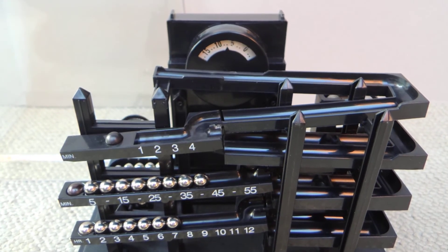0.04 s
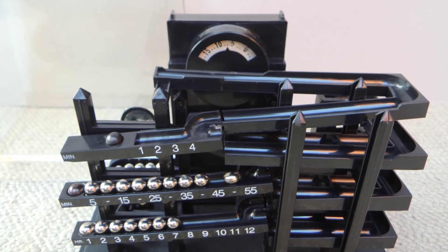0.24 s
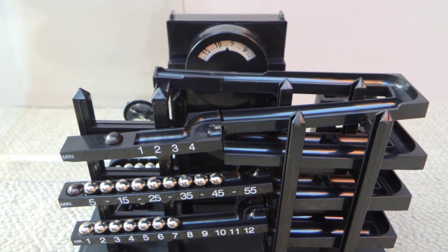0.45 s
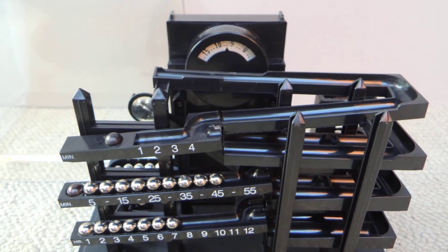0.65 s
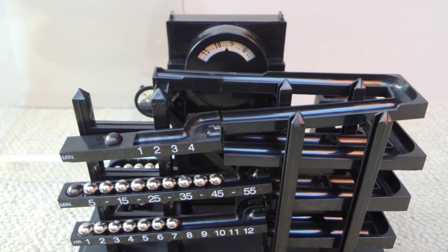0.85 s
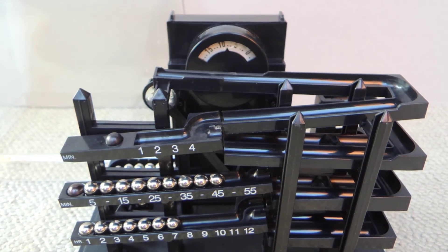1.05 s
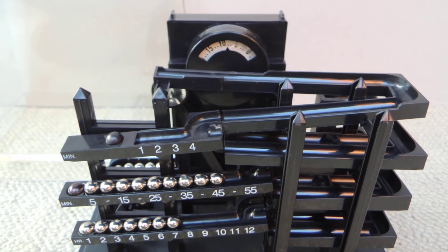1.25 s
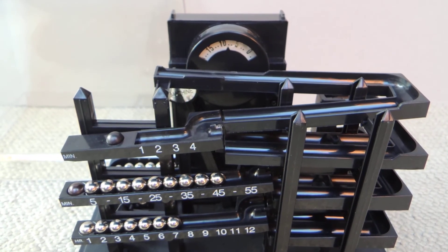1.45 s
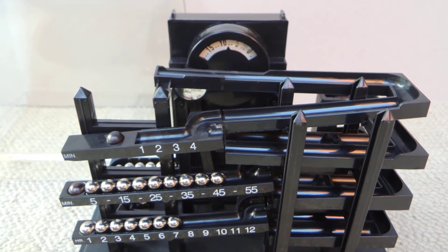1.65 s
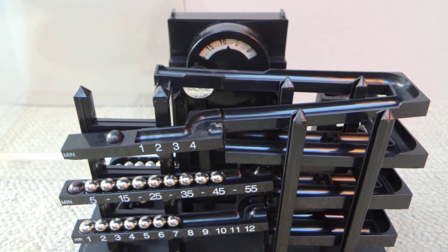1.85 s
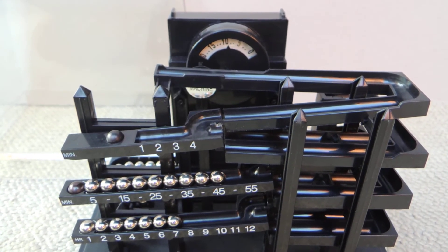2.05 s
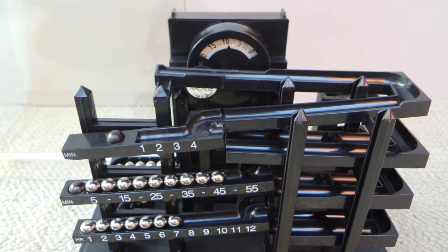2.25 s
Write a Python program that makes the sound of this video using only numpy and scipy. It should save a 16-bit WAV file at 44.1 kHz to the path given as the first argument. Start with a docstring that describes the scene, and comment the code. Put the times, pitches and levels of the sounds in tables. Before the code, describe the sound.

Close up in a quiet room, steel balls roll and clatter along a ball clock's plastic tracks over a faint motor hum. Five land in turn against a row of balls with bright clicks, and the rolling dies away.

```python
"""Steel balls run down the plastic rails of a rolling ball clock, heard close up in a quiet room.
From the start they rumble over tiny bumps while the drive hums underneath. They bounce lightly, knock
against the turns, click together and tick on the rail wall; the room gives each hit a short bright tail.
From 1.2 seconds on, five balls bump one by one into the waiting row and make the end stop ring.
Near 1.9 seconds the rolling dies away, leaving the hum, a low drone and one soft scuff."""
import sys
import numpy as np
from scipy import signal
from scipy.fft import rfft, irfft
from scipy.io import wavfile
from scipy.ndimage import uniform_filter1d

SR = 44100
rng = np.random.default_rng(int(sys.argv[2]) if len(sys.argv) > 2 else 0)


def generate_wav(signal):
    """Clip the signal to [-1, 1] and save it as 16-bit WAV at the path in sys.argv[1]."""
    frames = np.transpose(np.atleast_2d(signal))
    scaled = np.clip(frames, -1, 1) * 32767
    pcm = np.round(scaled).astype(np.int16)
    wavfile.write(sys.argv[1], SR, pcm)


N = 101429
HIT_TIME = np.arange(SR // 10) / SR  # seconds since a hit

# The thud, clack and treble of a hit. Each row: low edge in Hz, high edge in Hz, rise in seconds,
# fade in seconds, stereo width in dB, room echo in dB.
BANDS = [(530, 1880, 0.00086, 0.068, -24.5, -20.5), (2360, 5240, 0.00029, 0.03, -15, -19),
         (6070, 13370, 0.00019, 0.02, -6.5, -13.5)]
# The tone of the low rumble and of the bright grit. Each row: frequency in Hz, level in dB.
RUMBLE_TONE = [(200, -30.5), (330, -19), (480, -3), (680, -3.5), (1000, 0.5), (1350, -5), (2000, -7.5),
               (4000, -33.5)]
GRIT_TONE = [(1000, -19), (2000, -21), (2600, -1), (4300, -1), (4900, -9), (14000, -29)]


def undb(db):
    """Turn decibels into a number to multiply by."""
    return 10 ** (np.asarray(db) / 20)


def unit(x):
    """Scale a sound to an average strength (rms) of 1."""
    return x / np.sqrt(np.mean(x ** 2))


def burst(x):
    """Scale a hit so that its first 4.7 milliseconds have a strength of 1."""
    return x / np.sqrt(np.mean(x[..., :int(0.0047 * SR)] ** 2, axis=-1, keepdims=True))


def curve(rows, column=1):
    """Join (seconds, dB) points into a volume that changes over time."""
    rows = np.array(rows)
    return undb(np.interp(np.arange(N) / SR, rows[:, 0], rows[:, column]))


def colour(x, points):
    """Turn frequencies up or down along (Hz, dB) points."""
    hz, db = np.array(points).T
    freqs = np.maximum(np.fft.rfftfreq(x.shape[-1], 1 / SR), 1)
    return irfft(rfft(x) * undb(np.interp(np.log(freqs), np.log(hz), db)), x.shape[-1])


def band(x, low, high):
    """Keep the frequencies between low and high."""
    return signal.sosfilt(signal.butter(2, [low, high], "band", fs=SR, output="sos"), x)


def spread(pair, width_db):
    """Make stereo: one signal sits in the middle, the other adds width."""
    return pair[0] + undb(width_db) * pair[1] * np.array([[1], [-1]])


def fade(t, fade_s):
    """Die away by 60 dB in fade_s seconds."""
    return np.exp(-np.log(1000) * t / fade_s)


def add(track, start, sound):
    """Mix a sound in at a start time in seconds."""
    i = int(start * SR)
    track[:, i:i + sound.shape[-1]] += sound[..., :N - i]


def cluster(hz, width_hz, fade_s, scatter):
    """Twelve close tones fade together; with little scatter they start in step. High ones sound wider."""
    pitches = hz + width_hz * (rng.random((12, 2, 1)) - 1 / 2)
    cycles = pitches * HIT_TIME + scatter * rng.random((12, 2, 1))
    pair = burst(np.sin(2 * np.pi * cycles).sum(axis=0) * fade(HIT_TIME, fade_s))
    low, high, _, _, width_db, _ = np.array(BANDS).T
    return spread(pair, np.interp(hz, (low + high) / 2, width_db))


def resonate(tones):
    """A plastic part rings in a few narrow groups of tones."""
    return burst(sum(undb(db) * cluster(hz, 0.061 * hz, fade_s, scatter=0.53) for hz, db, fade_s in tones))


def frame_ring():
    """The plastic frame rings, struck at a random spot."""
    # The frame's own tones. Each row: pitch in Hz, level in dB, fade in seconds.
    tones = [(684.7, -9.5, 0.14), (901, 3.5, 0.063), (1005.3, 3.5, 0.062), (1612, 8.5, 0.048),
             (2598, -4.5, 0.088), (3396, -4.5, 0.072), (4264, 5, 0.016), (7270, 3, 0.032),
             (10660, 12, 0.0069)]
    phases = rng.uniform(0, 2 * np.pi, (len(tones), 2, 1))
    return sum(undb(db) * fade(HIT_TIME, fade_s) * np.sin(2 * np.pi * hz * HIT_TIME + phase)
               for (hz, db, fade_s), phase in zip(tones, phases))


def roll(tone, bumps_per_s, width_db, ring_db, smear_s):
    """Tiny uneven bumps under the rolling balls shake the frame."""
    sizes = undb(4 * np.clip(rng.standard_normal(N), -2, 2))
    bumps = (rng.random(N) < bumps_per_s / SR) * sizes
    smeared = signal.lfilter([1], [1, -np.exp(-1 / (smear_s * SR))], bumps)
    shaking = smeared * rng.standard_normal((2, N))
    ringing = signal.fftconvolve(shaking, frame_ring(), axes=1)[:, :N]
    both = unit(shaking) + undb(ring_db) * unit(ringing)
    return spread(unit(colour(both, tone)), width_db)


def rolling():
    """The running balls make a hollow rumble and a fine gritty rattle."""
    # How loud the rolling is. Each row: time in seconds, rumble in dB, grit in dB.
    levels = [(0, -39.5, -43), (.13, -40, -41), (.29, -40.5, -39.5), (.51, -44.5, -45), (.68, -43.5, -43.5),
              (.82, -47.5, -50), (.9, -40, -41.5), (1.13, -41, -40), (1.48, -45, -43.5),
              (1.73, -46.5, -43.5), (1.85, -43, -48.5), (1.9, -61, -69), (2.3, -59, -93)]
    rumble = roll(RUMBLE_TONE, bumps_per_s=2000, width_db=-22, ring_db=-15, smear_s=0.0024)
    grit = roll(GRIT_TONE, bumps_per_s=2200, width_db=-16.5, ring_db=-12, smear_s=0.00033)
    return rumble * curve(levels, column=1) + grit * curve(levels, column=2)


def wander(turns_per_s):
    """A value that drifts smoothly at random, with a strength of 1."""
    step = int(SR / turns_per_s)
    stairs = np.repeat(rng.standard_normal(N // step + 1), step)
    return unit(uniform_filter1d(stairs, step)[:N])


def wavering_tone(hz, waver_db):
    """A pure tone whose volume and pitch drift a little."""
    volume = np.sqrt(2) * undb(waver_db * wander(12))
    pitch = hz * (1 + 0.0166 * wander(17))
    return volume * np.sin(2 * np.pi * np.cumsum(pitch) / SR)


def drive():
    """The drive hums, along with a low wavering drone and its faint overtone."""
    # How loud the hum and the drone are. Each row: time in seconds, level in dB.
    hum_levels = [(0, -48.5), (.35, -50), (1.48, -55), (1.9, -65.5), (2.3, -58)]
    drone_levels = [(0, -74.5), (1.8, -61), (2.15, -63.5), (2.23, -49), (2.3, -65)]
    hum = curve(hum_levels) * wavering_tone(hz=64.2, waver_db=0.7)
    drone = curve(drone_levels) * wavering_tone(hz=91, waver_db=2.5)
    overtone = undb(-64.5) * wavering_tone(hz=186, waver_db=2.5)
    return hum + drone + overtone


def air():
    """Still room air makes a faint, deep rush."""
    # Each row: frequency in Hz, level in dB.
    tone = [(25, 2), (54, -10), (96, -6.5), (187, -9), (353, -14.5), (14000, -35)]
    return undb(-54) * spread(unit(colour(rng.standard_normal((2, N)), tone)), width_db=-6)


def strike(thud_db, clack_db, treble_db):
    """Steel hits plastic: a noisy crack, quickest in the treble, and the frame's ring."""
    out, ring = 0, undb(-19) * frame_ring()
    for (low, high, rise_s, fade_s, width_db, _), db in zip(BANDS, (thud_db, clack_db, treble_db)):
        noise = rng.standard_normal((2, len(HIT_TIME))) * fade(HIT_TIME, fade_s)
        crack = (noise + ring) * (1 - np.exp(-HIT_TIME / rise_s))
        out = out + undb(db) * spread(burst(band(crack, low, high)), width_db)
    return out


def taps():
    """Balls bounce lightly on the rails, each time with a small crack."""
    # Each row: start in seconds, level in dB, treble in dB compared with that level.
    bounces = [(.0305, -32.5, -8), (.1036, -30.5, -7), (.1788, -21.5, -16), (.2183, -28.5, -2),
               (.2384, -23.5, 0.5), (.3433, -32, 4), (.4262, -31, -3), (.4327, -24.5, -6),
               (.4834, -27, -12), (.596, -29.5, 0), (.6347, -25, -3), (.6557, -25, -8), (.682, -32.5, -5),
               (.7116, -30.5, -7), (.7276, -29, -9.5), (.775, -29.5, -10), (0.8624, -33, -15),
               (0.923, -37.5, 1), (.9598, -50, 17), (.9876, -27, -6), (1.0381, -30.5, -8.5),
               (1.0468, -29, -22), (1.2303, -26, -7), (1.2389, -24.5, -4), (1.2536, -26.5, -10),
               (1.3729, -34, -11), (1.487, -33.5, -16), (1.534, -30.5, -3.5), (1.658, -35, -15),
               (1.7517, -25, -6), (1.8392, -31, 2), (1.8815, -28.5, -4)]
    out = np.zeros((2, N))
    for start, db, treble_db in bounces:
        add(out, start, undb(db) * strike(thud_db=-9.5, clack_db=0, treble_db=treble_db))
    return out


def knocks():
    """Hard knocks ring both the part they hit and the clock's hollow plastic body."""
    # Each row: start in seconds, level in dB, thud in dB, treble in dB, ring pitch in Hz, ring in dB,
    # second ring in dB. Thud, treble and rings are compared with the row's level.
    hits = [(.0729, -25.5, -14, 3, 4450, 3.5, -10.5), (.1226, -32.5, -6, 10, 11740, 13, -19),
            (.1436, -23, -14, 1.5, 4000, 1, -5.5), (0.166, -26.5, 4.5, -1.5, 2600, -12, -4.5),
            (0.1713, -11, -9.5, 6, 2470, 2.5, -10), (0.2338, -22, -9, 6.5, 4400, -3, -9.5),
            (0.2541, -21.5, -6.5, 1.5, 4250, -1.5, -8), (0.3019, -19.5, -6, 6, 2600, 5, 4.5),
            (0.4512, -22.5, -4, 0, 12100, 8.5, -22), (0.5886, -26.5, -8, -2.5, 2480, 4, -23),
            (.968, -19.5, -8.5, 0.5, 2450, 1, -3.5)]
    # The body's own tones. Each row: pitch in Hz, level in dB, fade in seconds.
    body_tones = [(462.3, -3.5, 0.064), (723, 1.5, 0.017), (930, 3, 0.035)]
    out = np.zeros((2, N))
    for start, db, thud_db, treble_db, hz, ring_db, second_db in hits:
        ring = undb(ring_db) * cluster(hz, width_hz=300, fade_s=0.023, scatter=0.44)
        second_ring = undb(second_db) * cluster(1.5 * hz, width_hz=300, fade_s=0.023, scatter=0.44)
        body = undb(thud_db - 3) * resonate(body_tones)
        crack = strike(thud_db, 0, treble_db)
        add(out, start, undb(db) * (crack + ring + second_ring + body))
    return out


def clicks():
    """Two steel balls meet with a bright click and jolt the rail below."""
    # Each row: start in seconds, level in dB, middle pitch in Hz.
    meetings = [(0.275, -15, 10150), (0.3301, -19, 12500), (0.4553, -17, 11340), (0.463, -16, 9410)]
    out = np.zeros((2, N))
    for start, db, hz in meetings:
        steel = cluster(hz, width_hz=5800, fade_s=0.013, scatter=1)
        rail = strike(thud_db=-20.5, clack_db=-10.5, treble_db=-10.5)
        add(out, start, undb(db) * (steel + rail))
    return out


def ticks():
    """A rolling ball ticks against the rail wall and makes it ring."""
    # Each row: start in seconds, level in dB.
    touches = [(0.3593, -41.5), (0.3774, -30.5), (0.3928, -35), (0.4087, -29), (0.6552, -32)]
    out = np.zeros((2, N))
    for start, db in touches:
        ring = cluster(hz=2630, width_hz=300, fade_s=0.014, scatter=0.17)
        crack = strike(thud_db=-9.5, clack_db=-1, treble_db=-2.5)
        add(out, start, undb(db) * (ring + crack))
    return out


def arrivals():
    """Each arriving ball cracks against the waiting row and rings the same end stop."""
    # Each row: start in seconds, level in dB, ring in dB compared with that level.
    bumps = [(1.212, -23, 7), (1.362, -23, 7), (1.5164, -26, 9.5), (1.7342, -24.5, 6.5), (1.8668, -21.5, 7)]
    # The end stop's own tones. Each row: pitch in Hz, level in dB, fade in seconds.
    stop_tones = [(3035, -3, 0.046), (3515, 3, 0.053), (4230, 4.5, 0.034), (6750, -1, 0.022),
                  (9480, 4, 0.026), (10900, -2, 0.032)]
    out = np.zeros((2, N))
    for start, db, ring_db in bumps:
        crack = strike(thud_db=-5.5, clack_db=0, treble_db=3.5)
        add(out, start, undb(db) * (crack + undb(ring_db) * resonate(stop_tones)))
    return out


def scuff():
    """The mechanism scuffs once: a soft, short puff of noise."""
    peak_s, swell_s = 2.136, 0.011
    grit = unit(colour(rng.standard_normal(N), GRIT_TONE))
    rumble = unit(colour(rng.standard_normal(N), RUMBLE_TONE))
    swell = np.exp(-((np.arange(N) / SR - peak_s) / swell_s) ** 2)
    return undb(-50) * swell * (grit + rumble / 2)


def room(x):
    """Nearby walls scatter the thud, clack and treble into a short, blurred echo."""
    t = np.arange(SR // 2) / SR
    build_s, fade_s = 0.0095, 0.17
    tail = (fade(t, fade_s) * (1 - np.exp(-(t / build_s) ** 2))) ** 2
    out = 0
    for low, high, *_, echo_db in BANDS:
        energy = signal.fftconvolve(band(x.mean(axis=0), low, high) ** 2, tail / tail.sum())[:N]
        noise = unit(band(rng.standard_normal((2, N)), low, high))
        out = out + undb(echo_db) * np.sqrt(np.abs(energy)) * noise
    return spread(out, width_db=-5.5)


def scene():
    """The clock stands a little to the left; its front rails echo less than its end stop."""
    front = rolling() + taps() + knocks() + clicks() + ticks()
    far = arrivals()
    echo = room(undb(-1.5) * front + undb(1) * far)
    lean_left = undb([[0.55], [-0.55]])
    return (front + far + echo + drive() + air() + scuff()) * lean_left


def record(dry):
    """Flatten any peaks that are too loud, then cut the treble above 14000 Hz."""
    lowpass = signal.ellip(8, .3, 80, 14000, fs=SR, output="sos")
    return signal.sosfilt(lowpass, np.clip(dry, -1, 1))


dry = scene()
out = record(dry)
generate_wav(out)
```